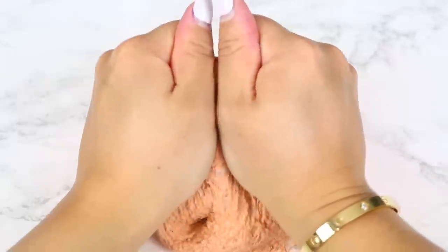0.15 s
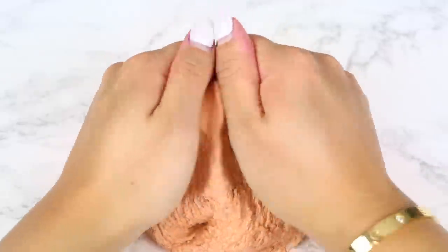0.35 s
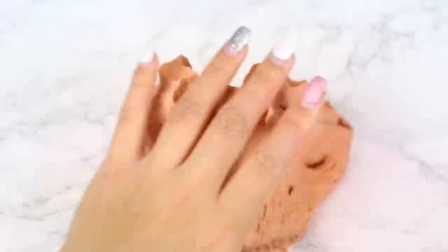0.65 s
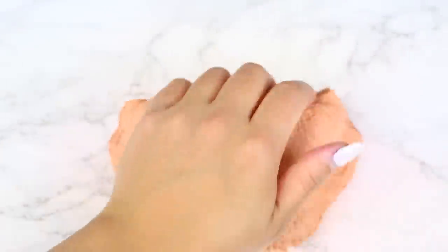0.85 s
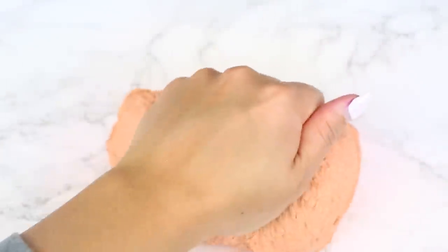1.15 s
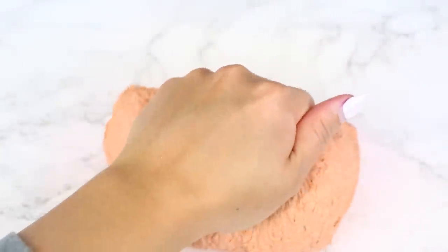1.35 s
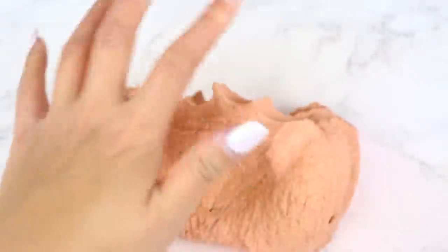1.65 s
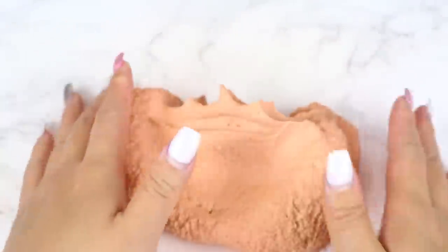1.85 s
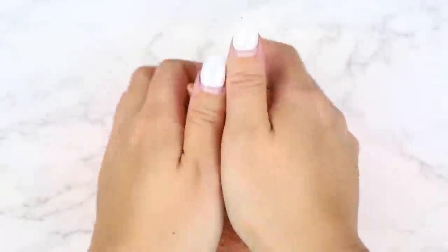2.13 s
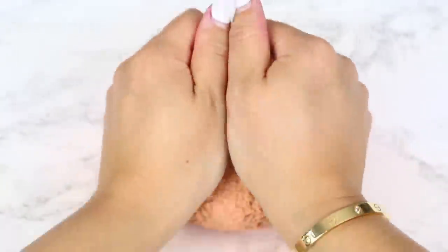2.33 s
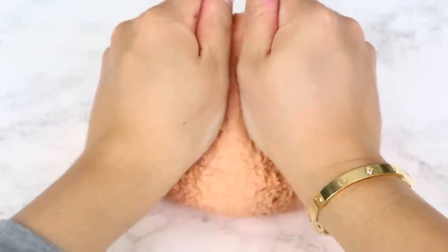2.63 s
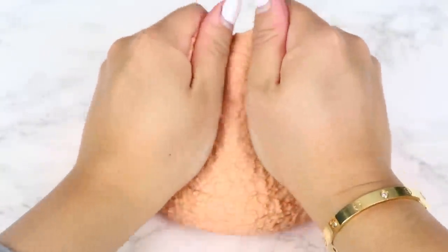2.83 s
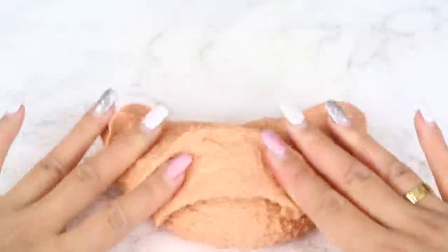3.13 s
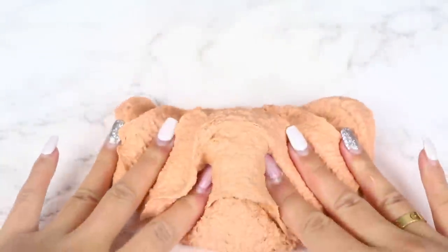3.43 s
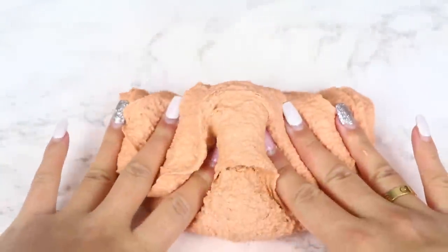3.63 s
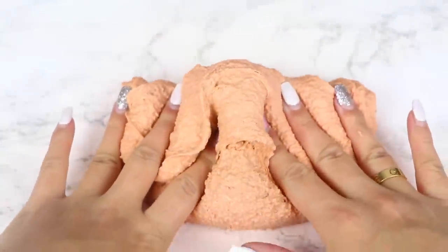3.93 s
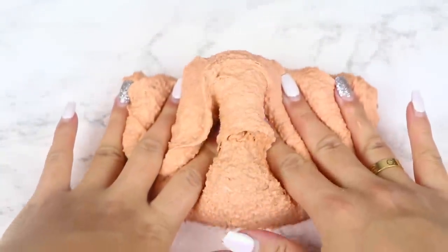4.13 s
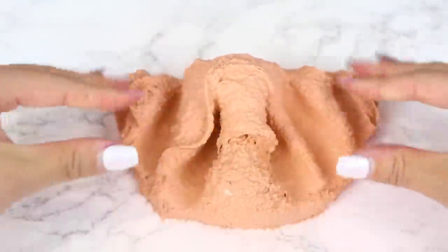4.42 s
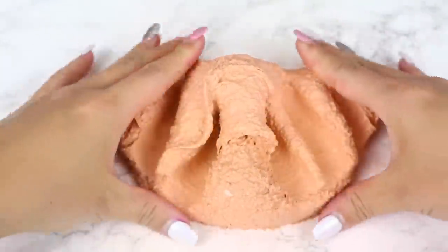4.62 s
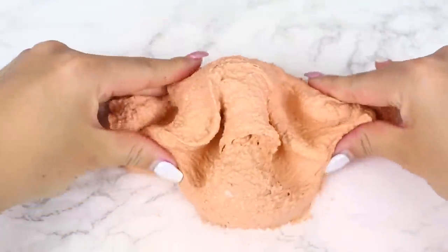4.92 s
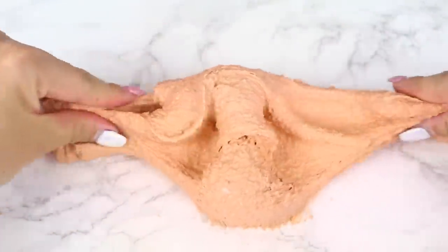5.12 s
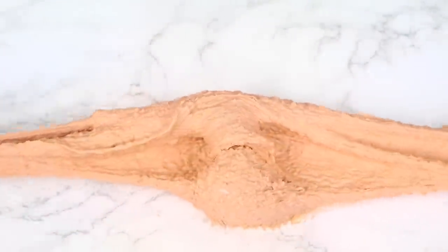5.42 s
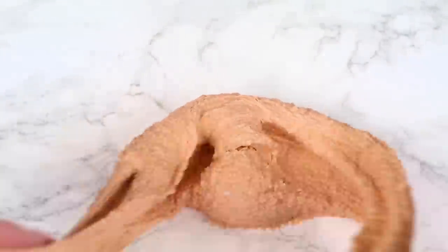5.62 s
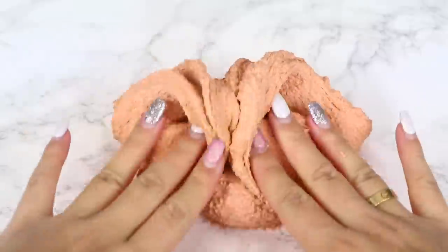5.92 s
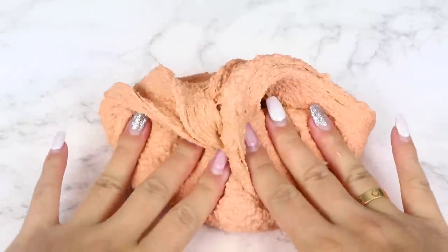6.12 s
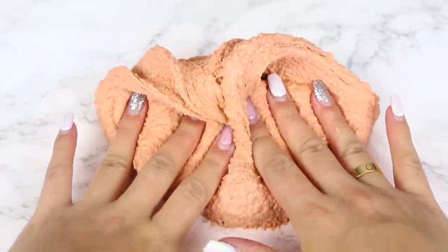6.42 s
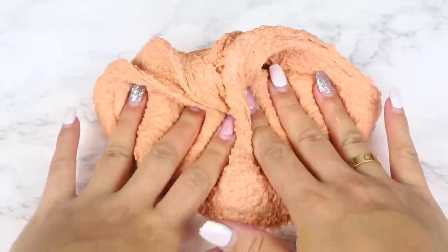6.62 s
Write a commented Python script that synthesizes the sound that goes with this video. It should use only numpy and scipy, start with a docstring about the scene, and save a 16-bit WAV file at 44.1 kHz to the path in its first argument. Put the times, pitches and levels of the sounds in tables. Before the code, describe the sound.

Close to a microphone in a small quiet room, hands knead thick airy slime on a hard table. A tight flurry of sharp pops opens, then a sticky crackling peel. Fizzing squeezes and scattered bubble snaps follow, with four more tearing peels between them, the last near the end. Soft low thumps come from the table, and faint hiss and hum stay beneath.

```python
"""Thick, airy slime worked by hand on a hard table in a small, quiet room, close to one microphone.
It opens under faint hiss and hum with squeezing fizz and a crowd of sharp pops, the loudest at 0.2 s.
From 0.33 s a hand peels off five times, the last near 6.7 s; squeezes and stray pops fill in between.
Pops are short rings, fizz is swarms of small ones; from 0.1 s pushes and knocks sound the table's modes.
Table top and walls return the slime as a bounce, echoes and a short tail."""
import sys
import numpy as np
from scipy import signal
from scipy.io import wavfile
from scipy.ndimage import uniform_filter1d

SR = 44100
rng = np.random.default_rng(int(sys.argv[2]) if len(sys.argv) > 2 else 0)


def wav_out(sig):
    """Save sig, one row per channel (or a flat mono array), as 16-bit PCM at SR to the path in sys.argv[1]."""
    wavfile.write(sys.argv[1], SR, np.round(np.clip(np.atleast_2d(sig).T, -1, 1) * 32767).astype(np.int16))


N = 298116

# Quiet room and microphone, relative colour: (frequency [Hz], level [dB per Hz])
AIR_COLOUR = [(15, -66), (25, -3), (44, -3.5), (74, -4.5), (135, 0), (252, -7), (280, -0.5), (378, -18),
              (410, -11), (651, -14.5), (878, -36.5), (1280, -21.5), (14800, -24.5), (16500, -13)]
# Faint steady noise, opposite in left and right, relative colour: (frequency [Hz], level [dB per Hz])
OPPOSITE_COLOUR = [(30, 2), (2000, -11), (4000, -10), (16000, -5)]
# Squeezing and stretching: (start [s], length [s], fizz [dB]; then above the fizz:
# squelch [dB], small pockets [dB], tiny pockets [dB])
SQUEEZES = [(0, 0.0037, -51, -27, 2, -3), (.13, 0.0081, -85, -12, 11, -8),
            (0.87, 0.072, -49.5, -17, -1.5, -6), (.99, 0.017, -51.5, -11, 0, 5),
            (1.065, 0.055, -54, -17, 1.5, 1.5), (1.914, 0.018, -59, -20, -6.5, -2.5),
            (2.036, 0.067, -45.5, -14.5, -8.5, -9), (2.14, .04, -49, -9.5, -3.5, -5),
            (2.228, 0.0084, -46.5, -33, -6.5, -8), (2.272, 0.34, -62, -16, -2.5, -2.5),
            (2.352, 0.0086, -53, -33, 8.5, 5), (2.498, 0.32, -67, -11.5, -16, 1.5),
            (2.674, 0.03, -69, -11, 19, 11), (3.16, 0.07, -65.5, -8, -8, 4),
            (3.328, 0.29, -65, -27, -8, -2), (4.7, 0.087, -75, -7, 8.5, 17.5),
            (4.8, 0.078, -57, -10, -1, 1.5), (4.92, 0.2, -56, -14, -2, -2),
            (5.073, 0.0079, -42.5, -11.5, -0.5, -5), (5.13, 0.049, -47, -15.5, -9, -5),
            (5.24, .04, -56.5, -17.5, -4, -4), (5.31, .09, -63.5, -18, -4, -1),
            (5.439, 0.02, -62, -14, 3, 1.5), (5.609, 0.01, -56, -18, 4.5, -8),
            (5.752, 0.015, -68, -25, -9, 1.5), (5.82, 0.027, -63, -15, -6, 6),
            (5.968, 0.0059, -54, -14, -3, -1.5), (6.098, 0.15, -66.5, -31, -2, -3)]
# A hand peels off the slime, one curve a peel: (time [s], fizz [dB]; then above the fizz:
# squelch [dB], wide pockets [dB], small and tiny pockets [dB])
PEELS = [
    [(.334, -63, -10, 0, 6), (.364, -46, -9.5, -1.5, -1.5), (.449, -37.5, -1.5, -2.2, 0.5),
     (.489, -46.5, -7.5, -0.31, 3), (.508, -51.5, -14, -2, -1), (.52, -66, -14, 0, 5)],
    [(1.5, -65.5, -4, 7, -3), (1.518, -41, -3, 8.5, -2.5), (1.556, -45, -4, 2, 0),
     (1.601, -48, 7.5, -8, 3.5), (1.628, -50, -32, -14, 0.5), (1.646, -61, -13, -4, -8)],
    [(2.87, -70, -8, 0, 0), (2.9, -56.5, -12, 0, -5), (2.928, -38.5, -16, -3.7, -2.5),
     (3.023, -43.5, 1, -0.77, 0.5), (3.063, -52.5, -8, -0.4, 1.5), (3.103, -57.5, 3, -0.27, 8),
     (3.138, -68, -4, 0, 0)],
    [(4.3, -66.5, -6, -3, -4), (4.315, -56, -4.5, 3, 13), (4.355, -30, -11.5, -10, -2.5),
     (4.385, -39.5, -2.5, -3, 2), (4.41, -48.5, -13, 3, -1.5), (4.43, -51.5, -9, -4, -7)],
    [(6.695, -69, -5, 0, 0), (6.725, -45.5, -2.5, 0, 6), (6.76, -37, -10.5, 0, 2.5)],
]
# The hollow under the hand, one value a peel: (resonance [Hz])
PEEL_HOLLOWS_HZ = [797, 880, 807, 730, 1280]
# Pocket sizes, rows wide, middle, small, tiny:
# (lowest [Hz], highest [Hz], ring until 30 dB down [cycles], bursts [per s], trim [dB])
POCKETS = [(1243, 2000, 5.9, 540, -6.5), (2300, 3230, 4.4, 800, -5), (4500, 8070, 10, 1400, -4),
           (7850, 11600, 1.4, 5100, -3)]
# Clear pops, levels at the slime: (time [s], snap [dB], snap pitch [Hz], ring [dB], ring pitch [Hz])
POPS = [(0.021, -26.5, 8240, -55, 3340), (0.023, -25, 10900, -47, 3570), (0.0505, -11, 10730, -61, 3360),
        (0.0564, -11, 7500, -28, 4070), (0.067, -35, 9300, -46, 3140), (0.1077, -16.5, 10500, -46, 2170),
        (0.121, -28, 8700, -48, 3530), (0.1253, -1.5, 10000, -44, 3470), (0.1768, -30, 11300, -68, 3360),
        (0.1995, -13, 12240, -53, 3360), (0.208, 1.5, 9760, -10.5, 2900), (0.4423, -26, 7100, -23.5, 2760),
        (0.4454, -15, 11100, -37.5, 3140), (0.4641, -34, 9100, -23, 860), (0.4859, -24.5, 7400, -54, 880),
        (0.593, -53, 6000, -49.5, 2600), (0.693, -59, 6000, -55, 3000), (0.7819, -42, 5350, -44, 3900),
        (0.795, -18.5, 9300, -45, 3530), (0.7977, -33, 8000, -36, 1650), (0.8353, -36, 8400, -39, 3350),
        (0.8612, -30, 8000, -33, 3000), (0.8648, -25, 8600, -31.5, 3430),
        (0.8942, -20.5, 9100, -27.5, 3260), (0.8993, -29, 7000, -31, 1580), (0.9253, -28, 12300, -48, 3400),
        (0.9298, -29, 10300, -37, 3970), (0.9348, -18.5, 10400, -43, 3040), (0.9388, -26, 10500, -44, 3530),
        (0.966, -29, 6500, -33, 3000), (0.9838, -27, 8000, -34, 1790), (0.9933, -18.5, 8060, -26, 3640),
        (0.9948, -14, 11600, -34, 2070), (1.0038, -31, 8200, -35, 4600), (1.0127, -23, 6450, -36, 2100),
        (1.023, -30, 10500, -43, 3230), (1.0548, -24, 12400, -29, 3420), (1.0572, -7, 9450, -20.5, 1740),
        (1.0688, -46, 8700, -24, 4950), (1.1173, -33, 8100, -32.5, 790), (1.1601, -29.5, 6100, -38.5, 2200),
        (1.2111, -23, 11700, -49, 3500), (1.2685, -35.5, 6060, -43.5, 4000),
        (1.306, -35.5, 10000, -51, 2330), (1.3817, -8, 10600, -29.5, 2420),
        (1.459, -41.5, 8000, -47.5, 2500), (2.0228, -38, 10100, -41, 2330), (2.165, -44, 6700, -39, 2670),
        (2.172, -39, 6300, -35, 2900), (2.1892, -29, 7150, -26, 2770), (2.2222, -29, 7000, -22, 1780),
        (2.226, -28, 6900, -22.5, 1830), (2.2339, -20, 10600, -47, 1720), (2.3043, -23.5, 6200, -50, 3670),
        (2.3326, -46, 6800, -37, 3670), (2.3399, -47, 5960, -21.5, 3830), (2.351, -14, 7100, -36, 2130),
        (2.3564, -16.5, 6600, -20.5, 3200), (2.4126, -31, 10700, -41, 3280), (2.4283, -41, 8600, -41, 1320),
        (2.4446, -31, 8440, -36.5, 1700), (2.4545, -32, 12800, -48, 2890), (2.5234, -66, 5970, -42.5, 2520),
        (2.5477, -43, 7100, -39, 1540), (2.585, -32.5, 11400, -40.5, 1150), (2.6215, -26, 7300, -36, 3340),
        (2.6651, -6.5, 7570, -23.5, 4100), (2.739, -72, 6300, -32, 1560), (2.763, -26.5, 10260, -38, 3350),
        (2.7715, -34, 9700, -37.5, 3550), (2.786, -24.5, 10500, -43, 3580), (2.8257, -44, 10200, -43, 1450),
        (3.2543, -33.5, 10200, -46.5, 2600), (3.3188, -25, 11000, -31.5, 2860),
        (3.3222, -26, 5940, -48, 3580), (3.5227, -38.5, 7050, -50, 3040), (3.5525, -41, 8540, -46.5, 2720),
        (3.6939, -46.5, 8300, -53.5, 3160), (3.8324, -37.5, 8040, -49.5, 3550),
        (3.8854, -60, 8100, -49.5, 680), (4.1676, -38.5, 11670, -50, 2130), (4.222, -61, 7000, -56.5, 765),
        (4.31, -27, 7200, -35, 1850), (4.677, -27, 6850, -36.5, 3870), (4.702, -30.5, 7750, -59, 3450),
        (4.7049, -28, 7600, -46, 4000), (4.7518, -37, 6300, -44.5, 3030), (4.7877, -30.5, 7740, -48, 3960),
        (4.8325, -26, 12700, -39.5, 3400), (4.878, -35, 6800, -51, 3230), (4.909, -35, 11700, -56, 3320),
        (4.948, -20, 10200, -37.5, 3200), (5.0741, -30, 6800, -31, 3660), (5.082, -40, 5800, -26.5, 3400),
        (5.3141, -34.5, 7000, -41, 1340), (5.3466, -38, 7200, -48, 1980), (5.4081, -36.5, 7340, -51, 3920),
        (5.8717, -32, 8100, -59, 4090), (5.9157, -27, 12200, -46, 3530), (5.949, -29.5, 9900, -31.5, 2470),
        (5.987, -37, 5000, -36, 4250), (6.004, -39, 8760, -56, 3570), (6.0193, -39, 8600, -45, 1420),
        (6.0546, -38, 10900, -46, 3600), (6.0851, -38.5, 8200, -47, 1490), (6.1406, -39, 9600, -47.5, 3360),
        (6.1506, -37, 11500, -65, 1170), (6.1735, -37, 10500, -50, 3160), (6.2107, -36.5, 5300, -29, 3080),
        (6.2143, -31.5, 9400, -41, 1360), (6.464, -33.5, 8800, -39, 3330), (6.5117, -38, 6800, -43, 1960),
        (6.5965, -20.5, 8500, -46, 3600), (6.7078, -30.5, 10600, -37, 1440),]
# First echoes, relative to the direct sound: (delay [s], level [dB])
ECHOES = [(.002, -25), (.0098, -19), (.0101, -23), (.0112, -29), (.0145, -27), (.022, -31)]
# Decay of the room's tail: (frequency [Hz], time to fall 60 dB [s])
ROOM_DECAY = [(300, 0.28), (1200, 0.26), (3500, 0.16), (9000, 0.064), (16000, 0.36)]
# Hands load the table: (start [s], length [s], hum of the table top [dB], rumble [dB])
PUSHES = [(.11, 0, -68, -66), (.2, 0, -61, -54), (.4, 0.056, -50.5, -71), (.52, 0.068, -63.5, -53),
          (.76, 0.02, -61, -55), (1.551, 0.068, -48.5, -56), (1.827, 0.0049, -57, -62.5),
          (1.933, 0.071, -55.5, -65.5), (2.14, 0.034, -54, -78), (2.28, 0.32, -70.5, -83),
          (5.57, 0.01, -59.5, -77), (2.923, 0.013, -57, -79), (3.02, 0.023, -50, -64),
          (4.36, 0.083, -48.5, -55), (4.63, 0.008, -63, -60), (5.12, 0.044, -58.5, -73),
          (6.75, 0.055, -51, -83)]
# Fingertips knock the table: (time [s], strength of the strike [dB])
KNOCKS = [(0.379, -54.5), (1.52, -58), (1.818, -55), (1.857, -52), (1.936, -55), (3.008, -58), (3.056, -82),
          (4.345, -45), (6.741, -48)]
# Modes of the free table top: (frequency [Hz], relative level [dB], time to fall 60 dB [s])
TABLE_MODES = [(142.4, 5.5, 0.57), (165.7, 14.5, 0.12), (275.4, -3, 0.45), (374, -32, 0.13)]

AIR_DB, OPPOSITE_DB = -63.5, -75.5
HUM_HZ, HUM_WIDTH_HZ, HUM_DB = 286, 14, -78
FULL_HZ, SPARSE_DB = 15850, -35.5  # fizz and air are this much fainter above FULL_HZ

STEP_S = .001  # time step of the gesture curves
SQUEEZE_RISE_DB_S, SQUEEZE_FALL_DB_S = 413, 224.5
SQUEEZE_WIDE_DB = -6  # wide pockets in a squeeze, relative to its fizz
SQUEEZE_HOLLOW_HZ, HOLLOW_WANDER = 892, 0.16  # hollow outside the peels; RMS wander of log pitch
PEEL_EDGE_DB_S = 500  # how fast a peel swells from and sinks into silence
PEEL_EVENNESS = 0.31  # share of clumping and tearing that a peel's dense fizz loses
AFTER_SNAP_DB, AFTER_RING_DB, AFTER_FALL_DB_S = -46.5, -49, 205  # dying fizz, relative to its pop
AFTER_SQUELCH_DB = -10.5  # squelch in that fizz, relative to its wide and middle pockets
REST_DB, REST_SQUELCH_DB, REST_TINY_DB = -76, -81, -83.5  # the lump settling on its own
HOLLOW_WIDTH_HZ = 337  # of each of the hollow's two resonances in series
WET_DB = 2.5  # large loose pockets beside the hollow

BODY_HZ, BODY_DB = 1352, -9.5  # the lump's dull thud, relative to each ring
BOUNCE_S, BOUNCE_DB = .00035, -11  # each pop comes back off the table top
PEAK_HZ, PEAK_WIDTH_HZ, PEAK_DB = 3730, 800, 4  # microphone's own resonance, added to the slime
NEAR_DB, NEAR_T60 = -18, 0.0047  # scatter off hands and slime [dB, s]
SHIFTS_PER_S = 3.96  # the hands keep changing that scatter
ROOM_DB = -14
PUSH_RISE_DB_S, PUSH_FALL_DB_S = 274, 257
RESTING_HUM_DB, RESTING_RUMBLE_DB = -78.5, -87.5
EDGE_HZ = 16800  # band limit of the recorder


def amp(db):
    """Gain from decibels."""
    return 10 ** (np.asarray(db) / 20)


def evened(x):
    """Scales to an RMS of 1."""
    return x / np.sqrt(np.mean(x ** 2) + 1e-20)


def smoothed(x, size):
    """Two passes of a moving average."""
    return uniform_filter1d(uniform_filter1d(x, size), size)


def read(points, hz):
    """Reads a table of (Hz, value) along a logarithmic frequency axis."""
    f, value = np.transpose(points)
    return np.interp(np.log(hz + 1), np.log(f + 1), value)


def resonate(x, hz, width_hz):
    """Shifts the curve hz down to zero, smooths, and shifts back: a resonance of gain 1."""
    turn = np.exp(2j * np.pi * np.cumsum(hz * np.ones(N)) / SR)
    r = np.exp(-np.pi * width_hz / SR)
    return 2 * (turn * signal.lfilter([1 - r], [1, -r], x / turn)).real


def held(start, length, rise_db_s, fall_db_s):
    """dB of gestures (rows) over time: a steady rise, a hold at 0, a steady fall."""
    t = np.arange(0, N / SR + STEP_S, STEP_S)
    start, end = np.c_[start], np.c_[start + length]
    return -rise_db_s * np.maximum(start - t, 0) - fall_db_s * np.maximum(t - end, 0)


def together(rows_db, rest_db):
    """Adds the power of all gestures to a resting level; gain, one value a sample."""
    power = (amp(rows_db) ** 2).sum(0) + amp(rest_db) ** 2
    return np.interp(np.arange(N) / SR / STEP_S, np.arange(len(power)), np.sqrt(power))


def air():
    """Steady hiss and hum of the room, drifting in patches, plus a faint noise of opposite sign left and right."""
    frames, hz = N // 256 + 5, np.fft.rfftfreq(1024, 1 / SR)
    a, b, c, d, patches = rng.standard_normal((frames, 513, 5)).T
    patches = uniform_filter1d(patches, 10, axis=0)  # over frequency
    patches = evened(uniform_filter1d(patches, 10, axis=1))  # over time
    colours_db = np.array([read(AIR_COLOUR, hz), read(OPPOSITE_COLOUR, hz)])[:, :, None]
    spectra = np.array([a + 1j * b, c + 1j * d]) * amp(colours_db + 2.7 * patches)
    shared, opposite = signal.istft(spectra, nperseg=1024, noverlap=768)[1][:, :N]
    return amp(AIR_DB) * evened(shared) + amp(OPPOSITE_DB) * evened(opposite) * [[1], [-1]]


def duller(x):
    """Lowers the top of the treble for the soft, steady sounds."""
    gain = [1, 1, amp(SPARSE_DB), amp(SPARSE_DB)]
    taps = signal.firwin2(511, [0, FULL_HZ, FULL_HZ + 120, SR / 2], gain, fs=SR)
    return signal.oaconvolve(np.atleast_2d(x), taps[None], "same")


def hum():
    """A faint hum in the room: a narrow band of noise, heard as a tone that wavers."""
    return amp(HUM_DB) * evened(resonate(rng.standard_normal(N), HUM_HZ, HUM_WIDTH_HZ))


def kneading():
    """Gains of the squelch and of each pocket size, the pitch of the hollow, and how uneven the fizz is."""
    # rows of every layer: squelch, then wide, middle, small and tiny pockets
    s, length, db, squelch_db, small_db, tiny_db = np.transpose(SQUEEZES)[:, :, None]
    shape = held(s[:, 0], length[:, 0], SQUEEZE_RISE_DB_S, SQUEEZE_FALL_DB_S) + db
    layers = [shape + np.array([squelch_db, 0 * db + SQUEEZE_WIDE_DB, 0 * db, small_db, tiny_db])]

    t = np.arange(shape.shape[1]) * STEP_S
    hollow_hz, uneven = SQUEEZE_HOLLOW_HZ * np.ones(len(t)), np.ones(len(t))
    for peel, hz in zip(PEELS, PEEL_HOLLOWS_HZ):
        s, db, squelch_db, wide_db, small_db = np.transpose(peel)
        columns = (squelch_db, wide_db, 0 * db, small_db, small_db)
        above = np.array([np.interp(t, s, column) for column in columns])
        edges = held(s[:1], s[-1] - s[0], PEEL_EDGE_DB_S, PEEL_EDGE_DB_S)
        layers.append((np.interp(t, s, db) + edges + above)[:, None])
        during = (t > s[0]) & (t < s[-1])
        hollow_hz[during], uneven[during] = hz, 1 - PEEL_EVENNESS

    # each pop sets off a dying fizz around it
    s, snap_db, _, ring_db, _ = np.transpose(POPS)
    snap_db, ring_db = snap_db + AFTER_SNAP_DB, ring_db + AFTER_RING_DB
    after = np.array([ring_db + AFTER_SQUELCH_DB, ring_db, ring_db, snap_db, snap_db])[:, :, None]
    layers.append(after + held(s, 0 * s, 1e4, AFTER_FALL_DB_S))

    seconds = np.arange(N) / SR
    wander = evened(smoothed(rng.standard_normal(len(t)), 60))
    hollow_hz = np.interp(seconds, t, hollow_hz * np.exp(HOLLOW_WANDER * wander))
    rests_db = (REST_SQUELCH_DB, REST_DB, REST_DB, REST_DB, REST_TINY_DB)
    squelch, *pockets = map(together, np.concatenate(layers, axis=1), rests_db)
    return squelch, pockets, hollow_hz, np.interp(seconds, t, uneven)


def ring(hz, cycles, rise=0.25, size=512):
    """A bursting pocket: a sine that swells over about `rise` cycles, 30 dB down after `cycles`."""
    turns = np.arange(size) / SR * hz
    shape = (1 - np.exp(-turns / rise)) * np.exp(-np.log(1000) * turns / (2 * cycles))
    return np.sin(2 * np.pi * turns) * shape / shape.max()


def bursts(per_s, spread_db):
    """Random bursts of either sign, most small, a few large if spread_db is above 0."""
    size = amp(spread_db * np.minimum(rng.exponential(1, N), 4.5)) * rng.choice([-1., 1.], N)
    return size * (rng.random(N) < per_s / SR)


def swarm(tears, low_hz, high_hz, cycles, per_s, count=6):
    """Pockets of nearby sizes burst at random, and all together at each tear."""
    total = np.zeros(N)
    for hz in np.geomspace(low_hz, high_hz, count):
        starts = evened(bursts(per_s / count, spread_db=3.5)) + 0.52 * tears
        total += signal.oaconvolve(starts, evened(ring(hz, cycles)))[:N]
    return evened(total)


def fizz():
    """Swarms of pockets in clumps; the large ones sound through the hollow between hand and slime."""
    squelch, pockets, hollow_hz, uneven = kneading()
    tears = uneven * evened(bursts(per_s=490, spread_db=0.0))
    clumps_db = uneven * 2.9 * evened(smoothed(rng.standard_normal(N), 400))
    large = swarm(tears, low_hz=318, high_hz=1730, cycles=1.9, per_s=980)
    hollow = resonate(large, hollow_hz, HOLLOW_WIDTH_HZ)
    hollow = resonate(hollow, hollow_hz, HOLLOW_WIDTH_HZ)
    out = squelch * (evened(hollow) + amp(WET_DB) * large)
    for (*sizes, trim_db), gain in zip(POCKETS, pockets):
        out += gain * amp(trim_db) * swarm(tears, *sizes)
    return amp(clumps_db) * out


def pops():
    """Each pop: a bright snap of the skin, the ring of the pocket that it opens, and a thud of the lump."""
    out = np.zeros(N + 512)
    for s, snap_db, snap_hz, ring_db, ring_hz in POPS:
        snap = ring(snap_hz, cycles=2.22, rise=1.0)
        thud = amp(BODY_DB) * ring(BODY_HZ, cycles=4.8)
        pocket = ring(ring_hz, cycles=2.38, rise=0.5) - thud
        out[round(s * SR) - 3:][:512] += amp(snap_db) * snap + amp(ring_db) * pocket
    bounce = np.roll(out, round(BOUNCE_S * SR))
    return out[:N] + amp(BOUNCE_DB) * bounce[:N]


def tail(start):
    """Sparse reflections of random sign, each band dying at its own speed; energy 1."""
    taps = np.zeros(SR // 2)
    at = np.arange(start, len(taps) - 8, 8)
    taps[at + rng.integers(0, 8, len(at))] = rng.choice([-1., 1.], len(at))
    taps *= np.clip(np.arange(len(taps)) / SR / .011, 0, 1)  # fills in once the walls answer
    hz, t, spectrum = signal.stft(taps, SR, nperseg=128)
    decay = amp(-60 * t / read(ROOM_DECAY, hz)[:, None])
    out = signal.istft(spectrum * decay, SR, nperseg=128)[1]
    return out / np.linalg.norm(out)


def room(x):
    """Direct sound, shifting near scatter, first echoes and tail."""
    walls = amp(ROOM_DB) * tail(start=130)
    walls[0] += 1  # direct sound
    for s, db in ECHOES:
        walls[round(s * SR)] += amp(db)

    # eight scatter patterns, crossfaded in turn
    tap = np.arange(420)
    near = rng.standard_normal((8, 420)) * amp(-60 * tap / SR / NEAR_T60) * (tap >= 20)
    near *= amp(NEAR_DB) / np.linalg.norm(near, axis=1)[:, None]
    phase = (np.arange(N) / SR * SHIFTS_PER_S - np.c_[:8]) % 8
    share = np.sin(np.pi * phase / 2) * (phase < 2)
    scatter = signal.oaconvolve(x * share, near, axes=1).sum(0)[:N]
    return signal.oaconvolve(x, walls)[:N] + scatter


def table():
    """Pushes shake the table top's modes and a slow rumble; knocks strike the modes once."""
    s, length, hum_db, rumble_db = np.transpose(PUSHES)
    load_db = held(s, length, PUSH_RISE_DB_S, PUSH_FALL_DB_S)
    t = np.arange(SR // 2) / SR
    modes = sum(amp(db - 60 * t / t60) * np.sin(2 * np.pi * hz * t) for hz, db, t60 in TABLE_MODES)

    damped = modes * amp(-80 * t)  # resting hands damp it
    shaken = signal.oaconvolve(rng.standard_normal(N), damped)[:N]
    strikes = np.zeros(N)
    for s, db in KNOCKS:
        strikes[round(s * SR)] = amp(db)
    struck = signal.oaconvolve(strikes, modes * (1 - np.exp(-t / 0.0014)))[:N]  # soft onset

    low_band = signal.butter(3, [26, 52], "bandpass", fs=SR, output="sos")
    rumble = signal.sosfilt(low_band, rng.standard_normal(N))
    table_hum = together(load_db + hum_db[:, None], RESTING_HUM_DB) * evened(shaken)
    return table_hum + struck + together(load_db + rumble_db[:, None], RESTING_RUMBLE_DB) * evened(rumble)


def scene():
    """The slime, coloured by the microphone and heard in the room, over table, hum and air."""
    slime = pops() + duller(fizz())[0]
    high_pass = signal.butter(2, 220, "high", fs=SR, output="sos")
    slime = signal.sosfilt(high_pass, slime)  # small pockets give no bass
    slime += amp(PEAK_DB) * resonate(slime, PEAK_HZ, PEAK_WIDTH_HZ)
    return room(slime) + table() + hum() + duller(air())


def record(dry):
    """Peaks beyond the ceiling are clipped; then the band limit of the recorder."""
    clipped = np.clip(dry, -.88, .88)
    low_pass = signal.firwin(1023, EDGE_HZ, window=("kaiser", 12), fs=SR)
    return signal.oaconvolve(clipped, low_pass[None], "same")


dry = scene()
out = record(dry)
wav_out(out)
```